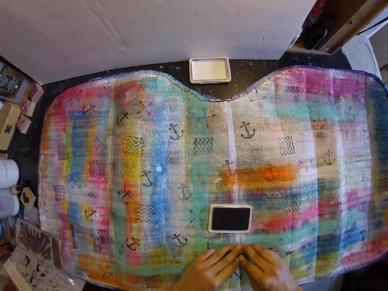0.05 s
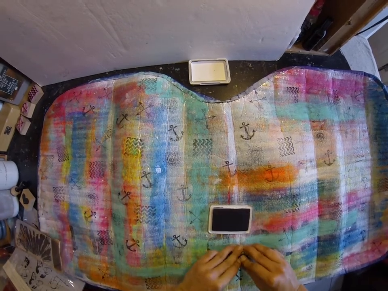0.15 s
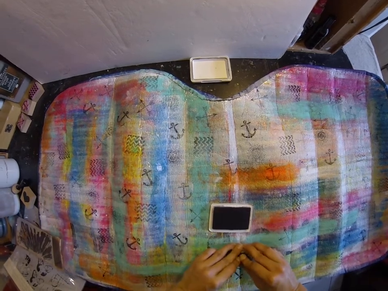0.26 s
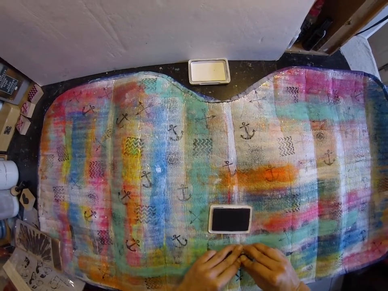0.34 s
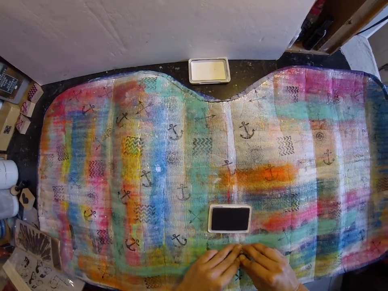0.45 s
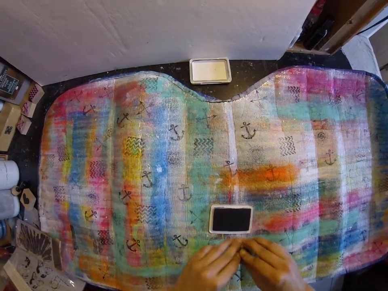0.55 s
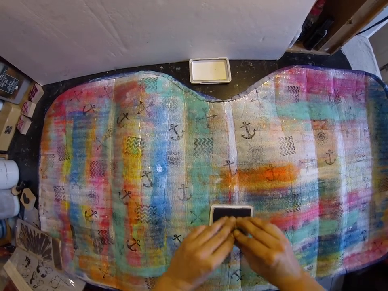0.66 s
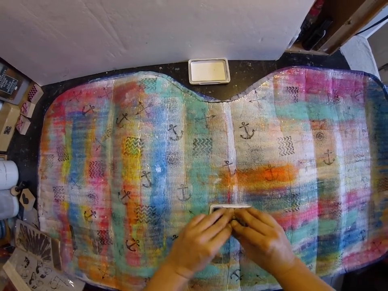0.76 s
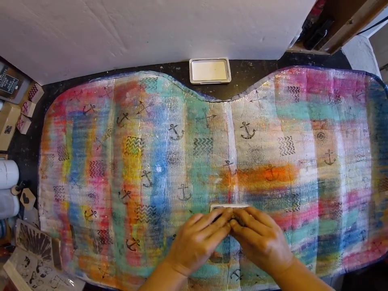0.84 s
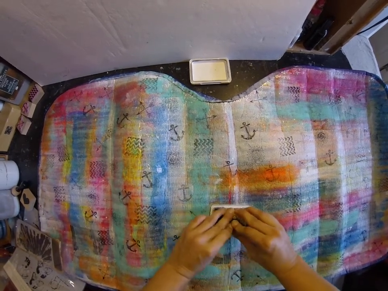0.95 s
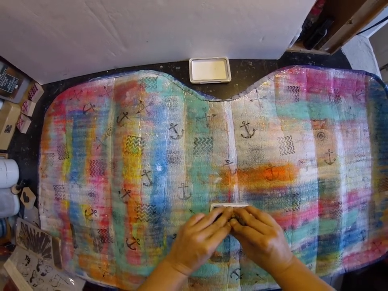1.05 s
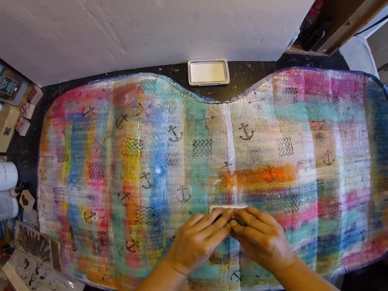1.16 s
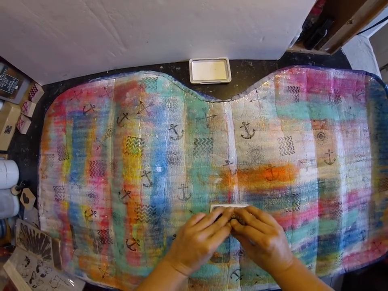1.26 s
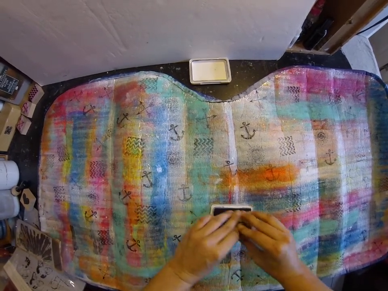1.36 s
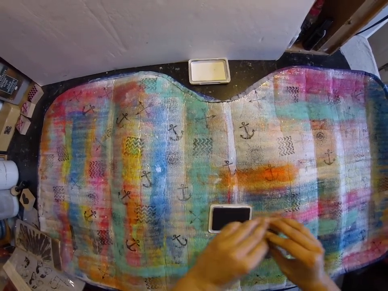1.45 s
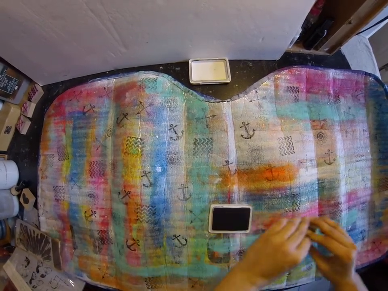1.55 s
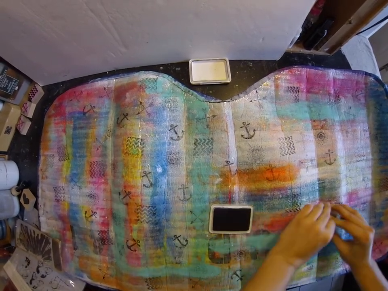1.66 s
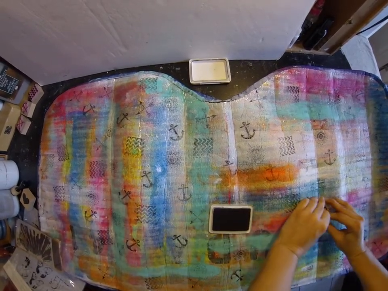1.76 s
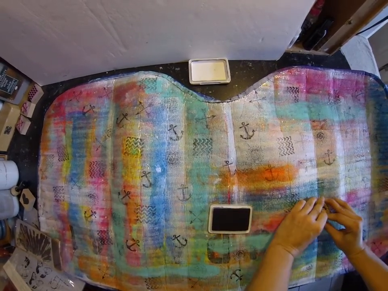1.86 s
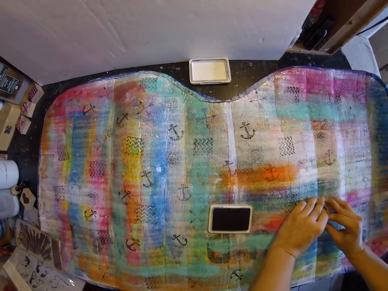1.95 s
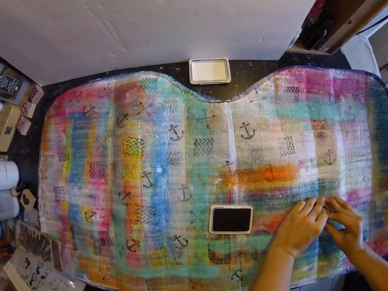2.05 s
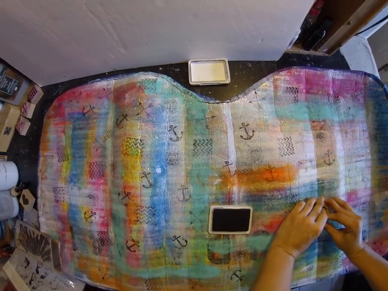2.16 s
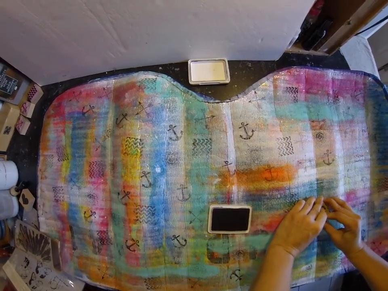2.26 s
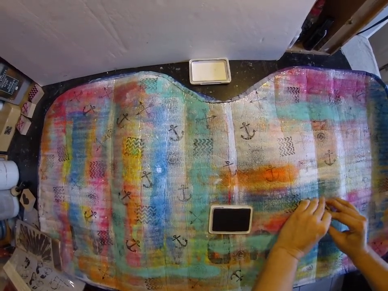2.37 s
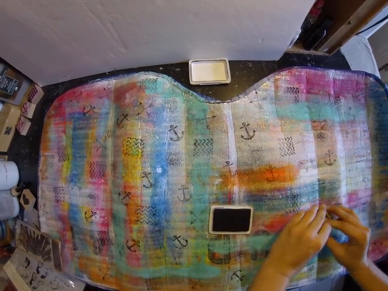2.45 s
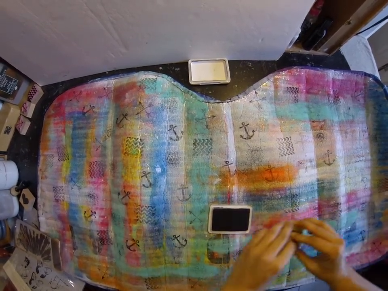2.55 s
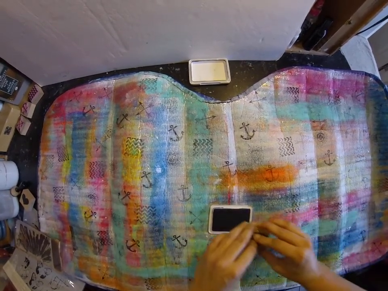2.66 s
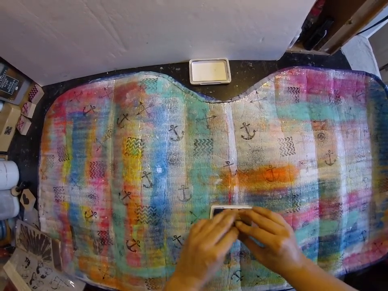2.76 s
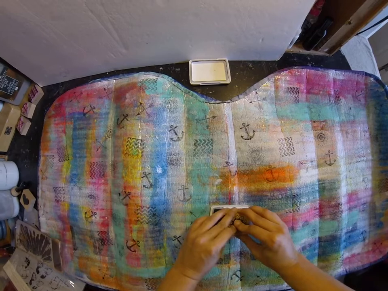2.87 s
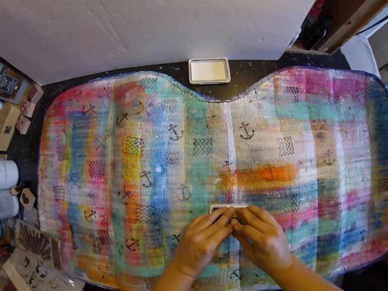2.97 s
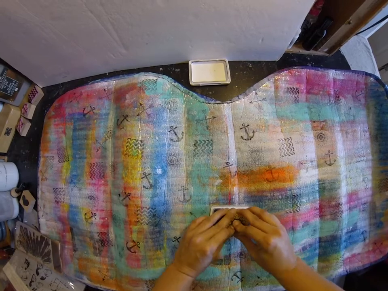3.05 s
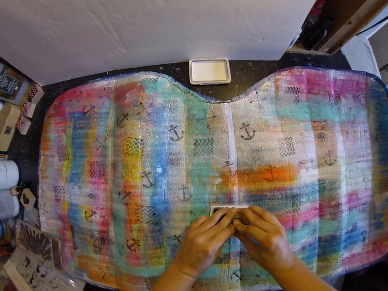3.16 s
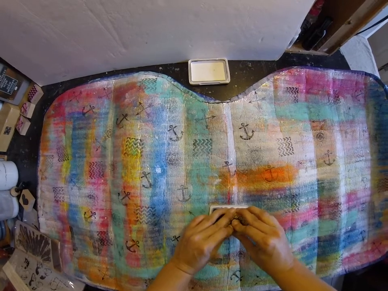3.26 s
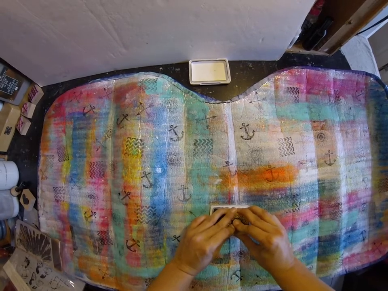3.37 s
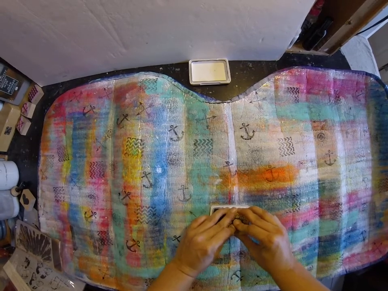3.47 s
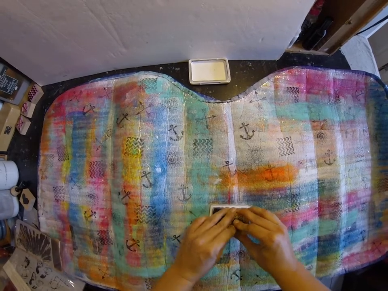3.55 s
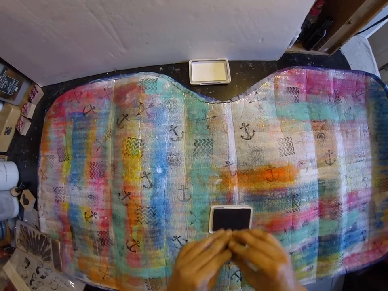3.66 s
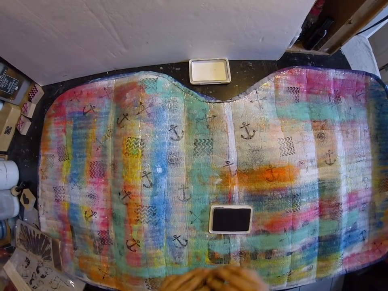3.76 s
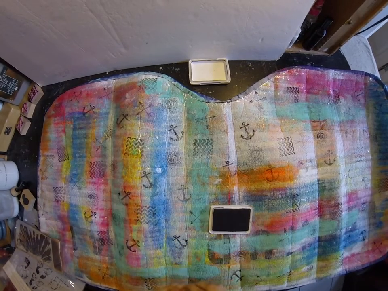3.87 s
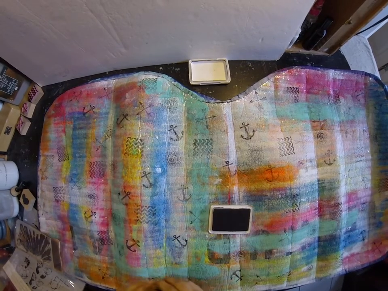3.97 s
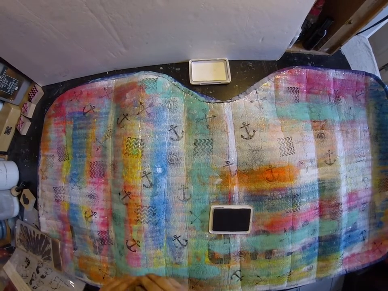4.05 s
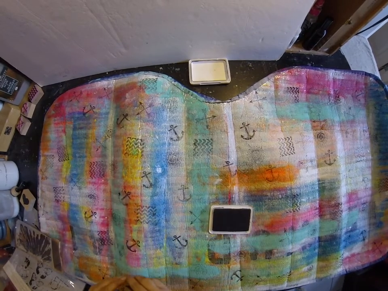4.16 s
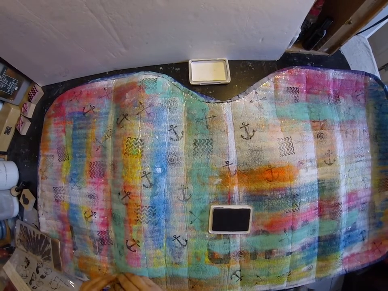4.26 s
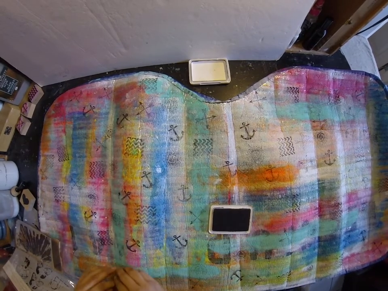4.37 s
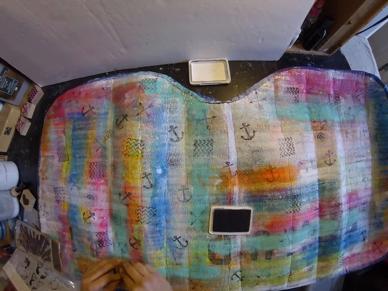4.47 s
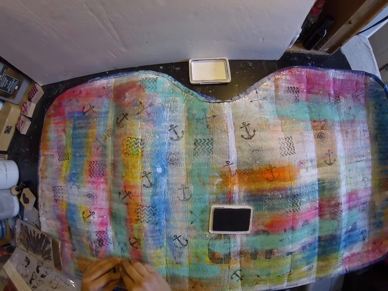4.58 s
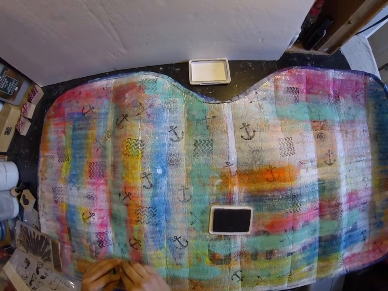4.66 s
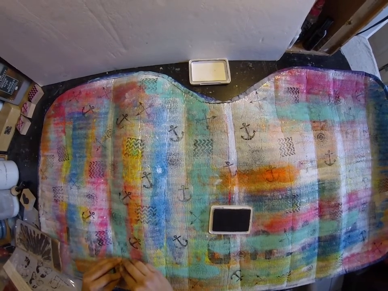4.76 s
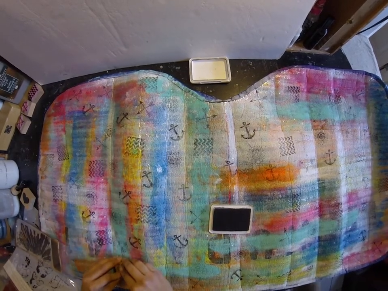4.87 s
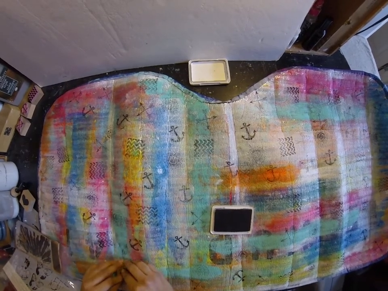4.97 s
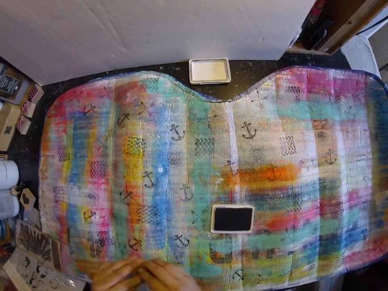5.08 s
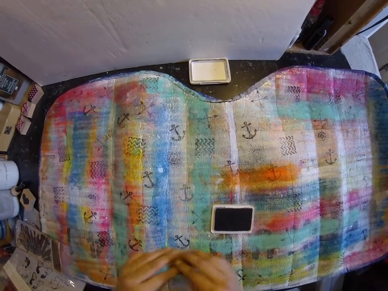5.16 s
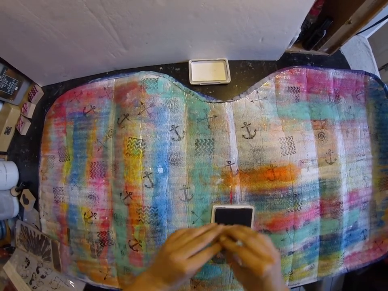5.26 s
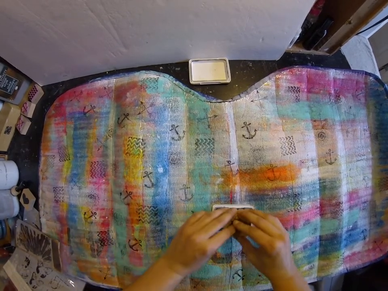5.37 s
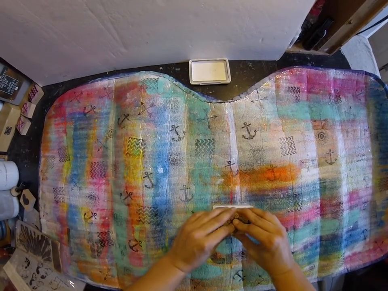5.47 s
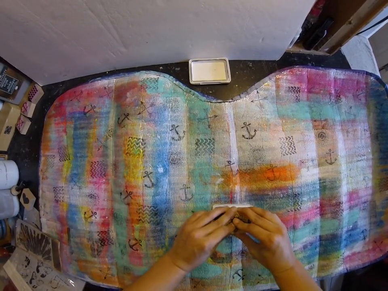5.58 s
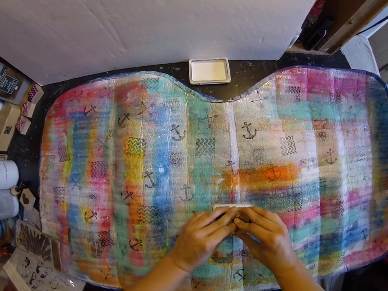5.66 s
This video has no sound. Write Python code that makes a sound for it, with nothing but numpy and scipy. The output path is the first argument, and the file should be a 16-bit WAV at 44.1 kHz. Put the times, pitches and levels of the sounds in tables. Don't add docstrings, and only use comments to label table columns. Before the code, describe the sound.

A close, table-coupled camera microphone in a small room picks up steady soft hiss, low uneven rumble from leaning arms, and a very faint, high circuit whine in rapid pulses. Faint crackles and small wooden knocks come first, with a dull tap at 0.2 s and a crisp crackle near 0.4. At 0.64 s a stamp lands: deep hollow boom, clear wooden knock, sheet crackle. Light taps follow around 1.0 and 1.35 s, with barely audible rubber squeaks later. A firmer push at 1.65 s jolts small objects into brief low ringing and crunches the sheet; a faint distant motor hums until 2.7. Crinkles rustle near 2.25 s. The hardest thud and knock hit at 2.7 s, then softer taps and crackles from 3.0 to 3.65. Another heavy, duller thud with strong crinkling comes at 4.35, a crackle at 4.87, and a lighter, brighter thud at 5.31, ending in faint rustling.

```python
import sys
import numpy as np
from scipy import signal
from scipy.io import wavfile
from scipy.ndimage import uniform_filter1d

SR = 44100
rng = np.random.default_rng(int(sys.argv[2]) if len(sys.argv) > 2 else 0)


def convert_level_to_amplitude(level_db):
    exponent = np.asarray(level_db, float) / 20
    return 10 ** exponent


def digitize_waveform(pressure):
    field = np.atleast_2d(pressure).T
    bounded = np.clip(field, -1, 1)
    quanta = np.round(bounded * 32767).astype(np.int16)
    wavfile.write(sys.argv[1], SR, quanta)


N = 252252
TIME = np.arange(N) / SR

# (frequency [Hz], level per Hz [dB])
AIR_COLOUR = [(100, -28.5), (170, -2), (217, -3), (323, -1.5), (600, -8), (830, -11), (1500, -14),
              (2000, -19), (3700, -21), (6100, -17.5), (12500, -18.5), (13100, -16), (14800, -11.5),
              (15200, -20)]
# (frequency [Hz], width [Hz], lift [dB])
CAMERA_CASE = [(2698.5, 500, 3.5), (4578.7, 302.7, 3.5), (6956.9, 78.04, 5.5), (8597.6, 306.2, 2.5),
               (11797, 320, -1)]
# (time [s], effort [dB])
LEANING = [(0, -45), (.21, -33.5), (.5, -43), (.95, -48), (1.18, -42.5), (1.6, -43), (2.15, -43),
           (2.45, -55), (2.65, -51), (2.95, -38.5), (3.1, -51), (3.25, -40.5), (3.5, -46), (3.9, -55.5),
           (4.3, -50), (4.85, -41), (5.15, -51.5), (5.72, -42)]
# (start [s], end [s], start pitch [Hz], end pitch [Hz], level [dB])
HUMS = [
    (1.6, 2.66, 155.7, 153, -45.5),
    (3.55, 4.2, 158, 159, -59),
]
# (time [s], pitch [Hz], level [dB], time to fade 60 dB [s])
TINGS = [(.2, 344.9, -33, 0.09907), (1.035, 581.4, -42.5, 0.0699), (1.653, 144.8, -15.5, 0.12581),
         (1.654, 232.8, -24, 0.06566), (1.655, 266.7, -27, 0.08), (2.705, 309, -28, 0.1106),
         (2.709, 503, -25, 0.0913), (2.87, 1530, -56, 0.165), (1.752, 1090, -44.5, 0.0671),
         (2.872, 4276, -50.5, 0.0502), (3.152, 558.1, -42.5, 0.1525), (4.306, 2017, -46, .06),
         (4.36, 194.9, -41, 0.373), (1.699, 199.6, -39.5, 0.231), (.389, 1300, -36, .04),
         (.39, 1800, -38, .035), (2.701, 2900, -36, .03), (2.701, 2000, -35, .03), (.64, 280, -27, .12),
         (.642, 1240, -37, .06), (2.043, 478.2, -46, 0.109), (1.958, 467.6, -46.5, 0.0681),
         (4.308, 1169, -50, 0.0921), (4.421, 2906, -44.5, 0.1959), (4.98, 4963, -49.5, 0.1017)]
# (middle [s], time to fade 10 dB [s], pitch [Hz], level [dB])
SQUEAKS = [
    (1.345, 0.0002, 5904, -58),
    (1.48, 0.0973, 4944, -57),
    (1.7, 0.016, 5007, -53.5),
    (1.81, 0.0586, 5290, -54.5),
]
# (lowest [Hz], highest [Hz])
CREASE_SIZES = [
    (2500, 7000),
    (900, 2300),
    (7000, 13500),
]
# (time [s], level [dB], large folds [dB], fine fizz [dB])
CRUSHES = [(0.031, -51, 1.5, 9.5), (.642, -51.5, 8, 12), (1.653, -39.5, -4.5, 2), (2.043, -53.5, 6, 10.5),
           (2.704, -42.5, 4.5, 3), (3.03, -54, 8.5, -24), (4.35, -36.5, 0.5, -3), (4.865, -38.5, 1.5, 1),
           (5.312, -49, 1, 8.5), (5.588, -58, -17, 7.5), (5.639, -50.5, -11, 9)]
# (middle [s], time to fade 10 dB, sign ignored [s], level [dB], large folds [dB], fine fizz [dB])
DRAGS = [(.14, 0.1534, -63, 7, -6.5), (.34, -0.105, -71.5, -14.5, -5.5), (0.394, 0.0339, -40, -4, 0),
         (.48, 0.2417, -59, 3, -11.5), (1.31, 0.2655, -58.5, 0, 0.5), (1.82, 0.1226, -52.5, -2.5, -23.5),
         (2.252, 0.0414, -47.5, 2, 8.5), (3.53, 0.2374, -54.5, -8, 1), (4.15, 0.1392, -60, -13.5, 5.5),
         (4.318, .01, -62, 18, -5.5), (4.615, .06, -55, 10, -17), (4.77, .035, -54, 4, -4),
         (5.02, 0.2329, -57.5, -11.5, -5.5), (5.39, 0.1533, -65, -6.5, -19.5), (5.6, 0.1381, -57.5, 3, 8.5),
         (5.69, 0.0421, -46, 6, 2.5)]
# (time [s], peak [dB], large folds [dB], fine fizz [dB], time to fade 60 dB [s])
BREAKS = [(0.389, -31, 0, -5, 0.0178), (0.638, -32.5, -19.5, -8, 0.05363), (1.6466, -39, 4, 1, 0.1819),
          (1.6553, -27, -13.5, -4, 0.06022), (2.2602, -32, -4.5, -9.5, 0.08454),
          (2.7019, -29, 0.5, -17.5, 0.06126), (3.025, -36.5, -43, -53, 0.03406),
          (4.351, -32.5, -35.5, -18.5, 0.0958), (4.8635, -35, -31, -2, 0.1095),
          (4.8749, -32.5, -4, -5, 0.1679), (5.3108, -38.5, 3, -6.5, 0.08365)]
# (time [s], peak [dB], large folds [dB], fine fizz [dB])
SNAPS = [(0.018, -55.5, -10, 12), (0.0247, -46.5, -13, 9.5), (0.0375, -55, -14, 4.5),
         (0.1574, -55, 11.5, -14), (0.358, -41.5, -10.5, 0.5), (1.0812, -48, -11.5, -15),
         (1.4144, -49, -1.5, 4), (1.7351, -48, -6, 1), (2.0398, -40, 7.5, -1), (2.052, -43.5, -4, 4.5),
         (2.2143, -53, -11.5, 13), (2.2406, -44.5, -3, 7), (2.2491, -36.5, -12.5, -4),
         (3.4935, -43.5, -14.5, -13.5), (3.658, -45, -12.5, -4), (4.306, -55.5, 13, -11.5),
         (4.578, -48, -17.5, -28), (4.667, -54, -5, -3.5), (5.2151, -49, -12, -7.5),
         (5.5171, -48.5, -1, -3.5), (5.587, -58, -9.5, 10), (5.6371, -51, -10.5, 9.5),
         (5.6726, -44, -4, -12), (5.6773, -52, 10, -15)]
# (frequency [Hz], level [dB], time to fade 60 dB [s])
WOOD = [(177.85, -6.5, 0.06148), (233.76, -12, 0.09397), (268.28, -4, 0.1446), (307.93, 0.5, 0.11756),
        (355.15, -3.5, 0.10042), (395.15, -3.5, 0.16182), (456.24, -4.5, 0.14392), (518.2, -3.5, 0.09093),
        (586.38, -8, 0.1477), (713.38, -1, 0.0619), (728.34, -14.5, 0.04807), (837.36, -16, 0.13885),
        (917.15, 0.5, 0.033124), (1004.8, -6, 0.02836), (1171.2, -4.5, 0.05243), (1287.6, -24.5, 0.1439),
        (1744.4, -16.5, 0.034), (2217.6, -32.5, 0.029)]
# (time [s], peak [dB], hardness [dB per octave], ring length [factor])
KNOCKS = [(0.05, -40.5, 2.5, 0.8074), (0.135, -35.5, -3.5, 1), (0.192, -22, -8.5, 0.4533),
          (0.203, -30, -5.5, 0.9824), (0.359, -32, -4, 0.6435), (0.535, -27.5, -1.5, 0.2554),
          (0.637, -15, 0.5, 0.7972), (0.997, -37.5, -4.5, 0.8756), (1.031, -39.5, -1, 0.565),
          (1.108, -62, -7.5, 0.503), (1.345, -35, -1.5, 0.5005), (1.502, -38, -5, 0.528),
          (1.651, -26.5, 2, 0.6425), (2.04, -39.5, 5, 0.598), (2.701, -8, 0.5, 0.7049),
          (3.029, -36, 4.5, 0.6798), (3.149, -35, -6.5, 0.7845), (3.18, -39, -8, 0.829),
          (3.267, -56, -7.5, 0.712), (3.488, -37.5, -2, 0.3455), (3.644, -33, -2, 0.566),
          (4.35, -23.5, -16, 0.6254), (4.42, -34, 7, 0.4126), (4.723, -37.5, 0.5, 0.991),
          (4.875, -35, 0, 0.422), (5.311, -18.5, -3, 0.7376), (5.714, -51.5, 5, 0.956)]
# (frequency [Hz], level [dB], time to fade 60 dB [s], direction of motion at the microphone [+1 or -1])
TABLE = [
    (38.8, -5.1, .186, -1),
    (57.3, -4.1, .198, 1),
    (129.5, -18.6, .375, -1),
    (46.3, -12, .356, 1),
    (25, -14.7, .043, 1),
    (103.4, -18.6, .118, 1),
]
# (time [s], force [dB], extra in tones above 100 Hz [dB])
PUSHES = [
    (.6368, -5.2, 1),
    (1.6513, -3.6, 0),
    (2.7002, 0, 1.5),
    (4.35, -2.6, 1.5),
    (5.3093, -5.7, 4),
]


def evened(x):
    return x / np.sqrt(np.mean(x ** 2) + 1e-20)


def band(x, lo_hz, hi_hz, order=2):
    sos = signal.butter(order, [lo_hz, min(hi_hz, SR / 2.1)], "band", fs=SR, output="sos")
    return signal.sosfilt(sos, x)


def add(mix, s, sound):
    part = mix[max(round(s * SR), 0):][:len(sound)]
    part += sound[:len(part)]


def ring(hz, db, t60, t):
    return convert_level_to_amplitude(db - 60 * t / t60) * np.sin(2 * np.pi * hz * t)


def resonate(x, hz, width_hz):
    turn = np.exp(2j * np.pi * hz * TIME)
    r = np.exp(-np.pi * width_hz / SR)
    return 2 * (turn * signal.lfilter([1 - r], [1, -r], x / turn)).real


def drift(per_s):
    size = int(SR / per_s)
    return evened(uniform_filter1d(uniform_filter1d(rng.standard_normal(N), size), size))


def peak(s, rise_db_per_s, fall_db_per_s, hold_s=0):
    before = np.minimum(TIME - s, 0)
    after = np.maximum(TIME - s - hold_s, 0)
    return convert_level_to_amplitude(rise_db_per_s * before - fall_db_per_s * after)


def swell(middle_s, fade_s):
    return peak(middle_s, 10 / abs(fade_s), 10 / abs(fade_s))


def air():
    frames, hz = N // 256 + 5, np.fft.rfftfreq(1024, 1 / SR)
    a, b, patches = rng.standard_normal((frames, 513, 3)).T
    patches = evened(uniform_filter1d(uniform_filter1d(patches, 10, 0), 12, 1))
    f, db = np.transpose(AIR_COLOUR)
    colour_db = np.interp(np.log(hz + 1), np.log(f + 1), db)
    for middle, width, lift_db in CAMERA_CASE:
        colour_db += lift_db * np.exp(-((hz - middle) / width) ** 2)
    spectrum = (a + 1j * b) * convert_level_to_amplitude(colour_db[:, None] + 1.1 * patches)
    hiss = signal.istft(spectrum, nperseg=1024, noverlap=768)[1][:N]
    return convert_level_to_amplitude(-53.5) * evened(hiss)


def whine():
    bursts = TIME * 47.98
    strength, pitch = rng.standard_normal((int(bursts[-1]) + 1, 2))[bursts.astype(int)].T
    is_on = (bursts % 1 > .11) & (bursts % 1 < .49)
    gate = uniform_filter1d(is_on * 1., size=24)
    turn = 2 * np.pi * np.cumsum(12895 + 30 * pitch) / SR
    tone = np.sin(turn) + convert_level_to_amplitude(-13) * np.sin(turn / 2)
    return np.sqrt(2) * convert_level_to_amplitude(-57.5 + 1.358 * strength) * gate * tone


def hum():
    out = np.zeros(N)
    for start, end, start_hz, end_hz, db in HUMS:
        hz = np.interp(TIME, [start, end], [start_hz, end_hz])
        receding = convert_level_to_amplitude(db - 6 * np.maximum(TIME - start, 0))
        passing = peak(start, 48, 77, hold_s=end - start)
        out += receding * passing * np.sin(2 * np.pi * np.cumsum(hz) / SR)
    return np.sqrt(2) * convert_level_to_amplitude(1.2 * drift(5.57)) * out


def rumble():
    s, effort = np.transpose(LEANING)
    effort_db = np.interp(TIME, s, effort)
    upper_db = -50.5 + 0.3152 * (effort_db - effort_db.mean()) - 1.7644 * TIME
    shake = rng.standard_normal((3, N))
    low = evened(band(shake[0], 24, 64)) * convert_level_to_amplitude(np.minimum(effort_db, -37) + 2 * drift(7))
    upper = evened(resonate(shake[1], 129.5, 19.59)) + 0.372 * evened(band(shake[1], 44, 220.3))
    upper = band(upper, 70, 220) * convert_level_to_amplitude(upper_db + 2 * drift(9))
    sway = evened(band(shake[2], 3.977, 21.563)) * convert_level_to_amplitude(-40)
    return low + upper + sway


def tings():
    out, t = np.zeros(N), TIME[:SR // 4]
    for s, hz, db, t60 in TINGS:
        pair = ring(hz, db, t60, t) + ring(hz * 1.012, db - 12, t60, t)
        add(out, s, pair * np.minimum(t / 0.004076, 1))
    return out


def squeaks():
    out, rub = np.zeros(N), rng.standard_normal(N)
    for s, fade_s, hz, db in SQUEAKS:
        out += convert_level_to_amplitude(db) * swell(s, fade_s) * evened(resonate(rub, hz, 624))
    return out


def crinkles():
    unevenness = np.minimum(rng.exponential(1, N // 16 + 1), 3)
    grains = rng.standard_normal(N) * convert_level_to_amplitude(2.5 * np.repeat(unevenness, 16)[:N])
    middle, large, fine = (evened(band(grains, *edges, order=1)) for edges in CREASE_SIZES)
    moves = [(peak(s, 1299.5, 190), *dbs) for s, *dbs in CRUSHES]
    moves += [(swell(s, fade_s), *dbs) for s, fade_s, *dbs in DRAGS]
    moves += [(0.7301, -70, 0, 0)]
    out = np.zeros(N)
    for shape, db, folds_db, fizz_db in moves:
        out += shape * convert_level_to_amplitude(db - 7) * (middle + convert_level_to_amplitude(folds_db) * large + convert_level_to_amplitude(fizz_db + 0.5) * fine)
    return out


def cracks():
    out, t = np.zeros(N), TIME[:SR // 5]
    events = [(*row, 1.787) for row in BREAKS]
    events += [(*row, 0.06056, 0.76) for row in SNAPS]
    for s, db, folds_db, fizz_db, t60, rise_ms in events:
        u = t * 1000 / rise_ms
        burst = u * np.exp(1 - u)
        tail = 0.739 * convert_level_to_amplitude(-60 * t / t60) * np.minimum(u, 1)
        crack = rng.standard_normal(len(t)) * (burst + tail)
        middle, large, fine = (band(crack, *edges, order=1) for edges in CREASE_SIZES)
        add(out, s, convert_level_to_amplitude(db - 2) * (middle + convert_level_to_amplitude(folds_db + 6.5) * large + convert_level_to_amplitude(fizz_db + 4) * fine))
    return out


def knocks():
    out, t = np.zeros(N), TIME[:SR // 4]
    for s, db, hard_db, ringing in KNOCKS:
        blow = np.zeros(len(t))
        for hz, tone_db, t60 in WOOD:
            detune, share = rng.standard_normal(2)
            level_db = tone_db + hard_db * np.log2(hz / 310) + 2.5746 * share
            blow += ring(hz * (1 + 0.02618 * detune), level_db, t60 * ringing, t)
        blow *= 1 - np.exp(-t / .0008)
        add(out, s + 0.0019238, convert_level_to_amplitude(db) * blow / abs(blow).max())
    return out


def thuds():
    out, t = np.zeros(N), TIME[:SR // 2]
    soft_start = 1 - np.exp(-t / .0066)
    for s, force_db, upper_db in PUSHES:
        thud = np.zeros(len(t))
        for hz, db, t60, direction in TABLE:
            thud += direction * ring(hz, db + upper_db * (hz > 100), t60, t)
        add(out, s, convert_level_to_amplitude(force_db) * thud * soft_start)
    return out


def room(x):
    t = TIME[:SR // 3]
    echoes = rng.choice([-1., 1.], len(t)) * (rng.random(len(t)) < .25) * (t > .004)
    dull = band(echoes, 150, 1500) * convert_level_to_amplitude(-60 * t / .3)
    bright = band(echoes, 1500, 15000) * convert_level_to_amplitude(-60 * t / .2)
    tail = dull + bright
    return signal.fftconvolve(x, tail / np.linalg.norm(tail))[:N]


def scene():
    background = air() + whine() + hum() + rumble()
    near = tings() + squeaks() + crinkles() + cracks() + knocks()
    return (background + near + convert_level_to_amplitude(-12.5) * room(near) + thuds())[None]


def roll_off(x):
    return signal.sosfilt(signal.butter(12, 15880, fs=SR, output="sos"), x)


def record(dry):
    treble_cut = signal.firwin(801, 15330, window=("kaiser", 8), fs=SR)
    mix = signal.oaconvolve(dry, treble_cut[None], "same") + .128
    return roll_off(mix)


dry = scene()
out = record(dry)
digitize_waveform(out)
```